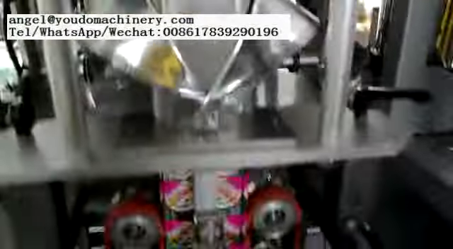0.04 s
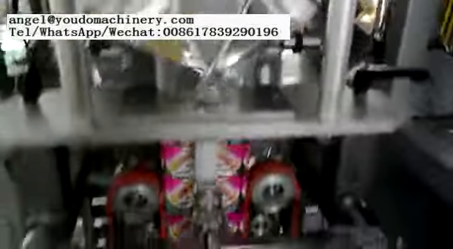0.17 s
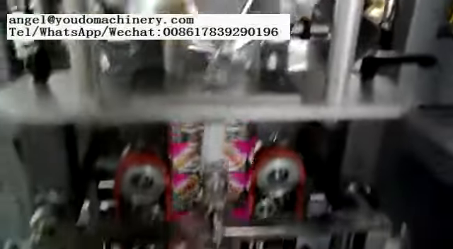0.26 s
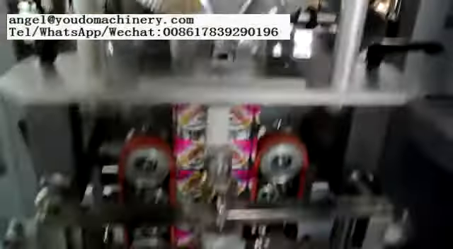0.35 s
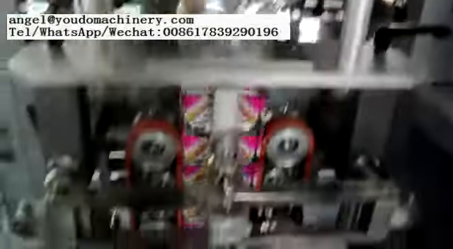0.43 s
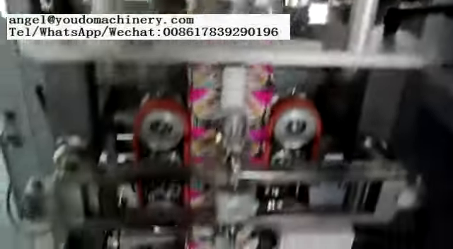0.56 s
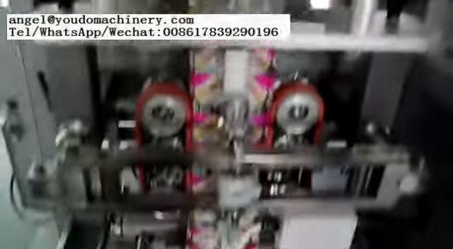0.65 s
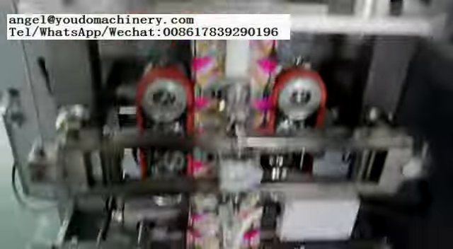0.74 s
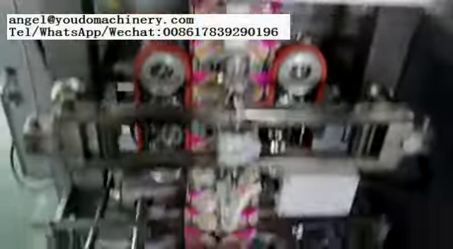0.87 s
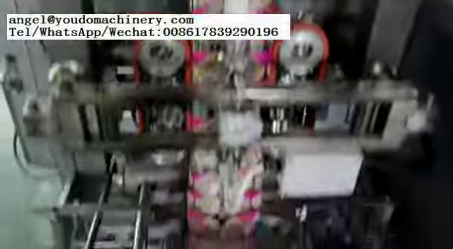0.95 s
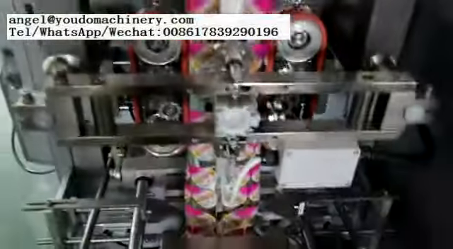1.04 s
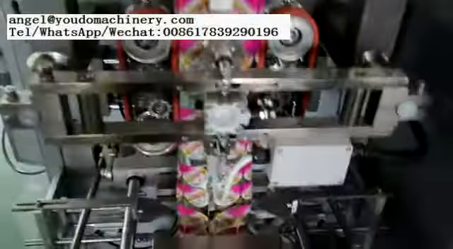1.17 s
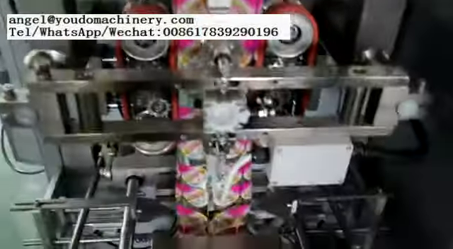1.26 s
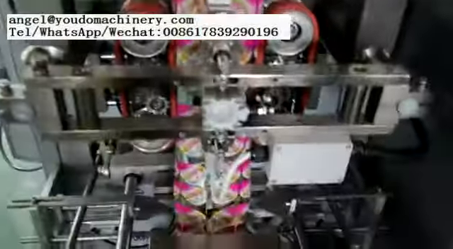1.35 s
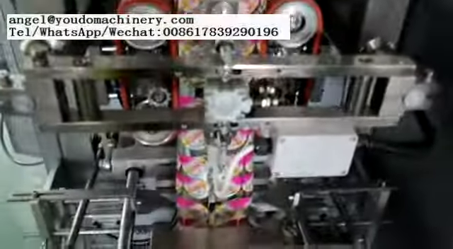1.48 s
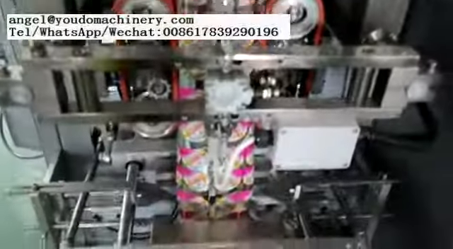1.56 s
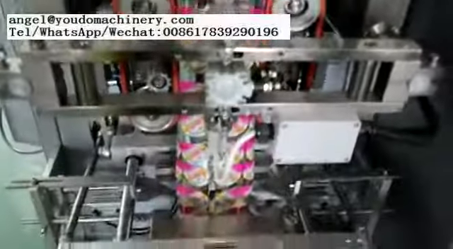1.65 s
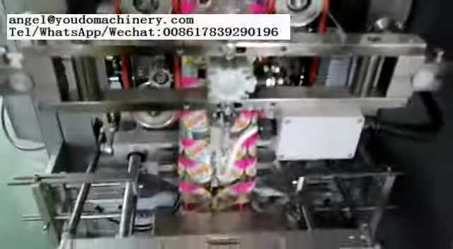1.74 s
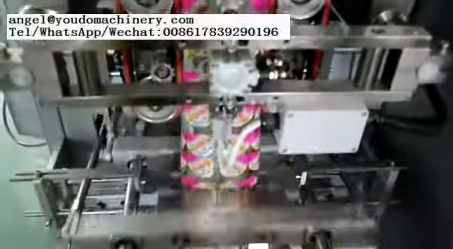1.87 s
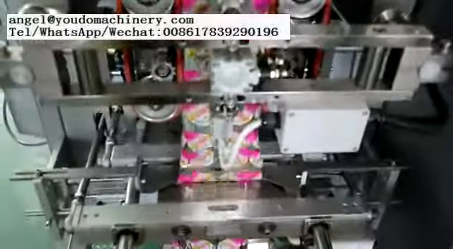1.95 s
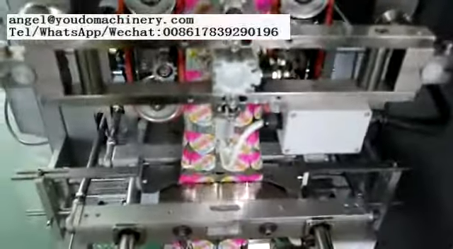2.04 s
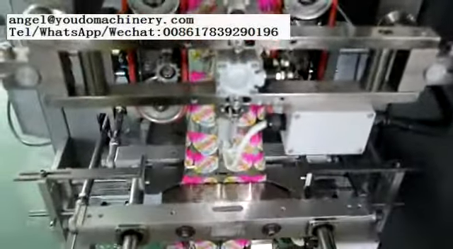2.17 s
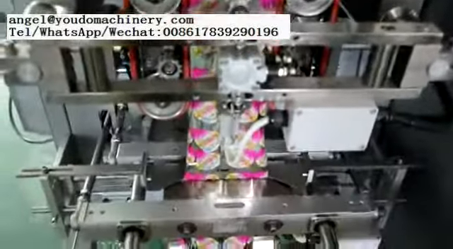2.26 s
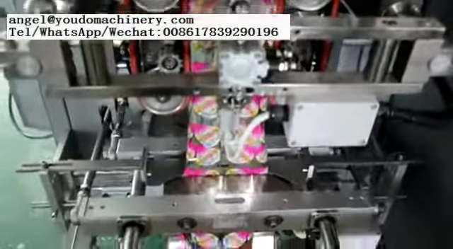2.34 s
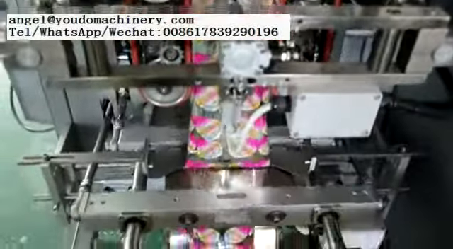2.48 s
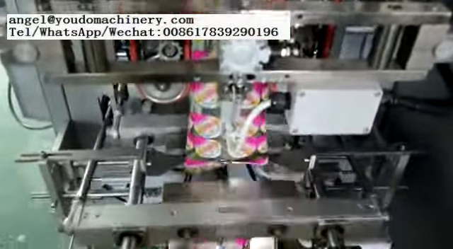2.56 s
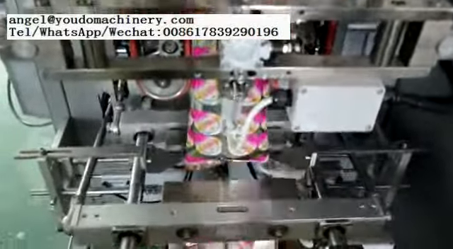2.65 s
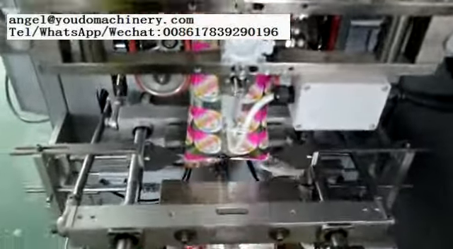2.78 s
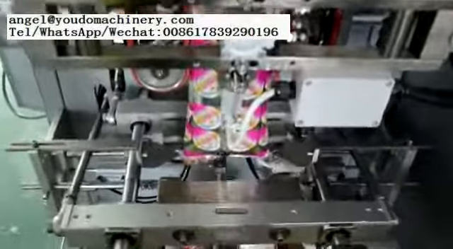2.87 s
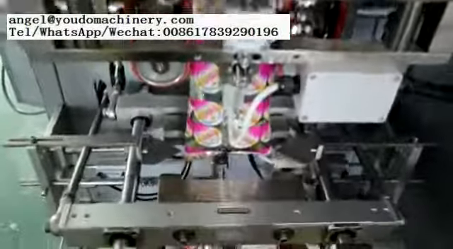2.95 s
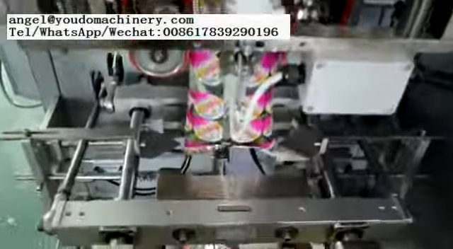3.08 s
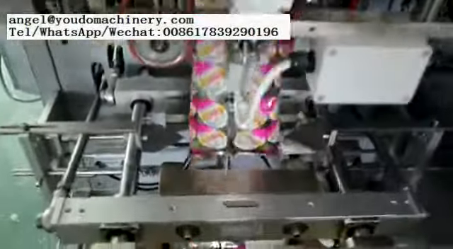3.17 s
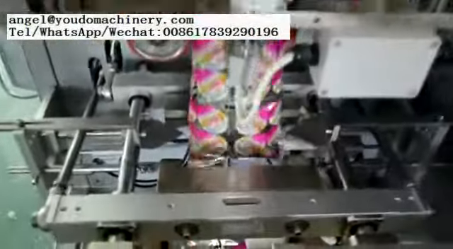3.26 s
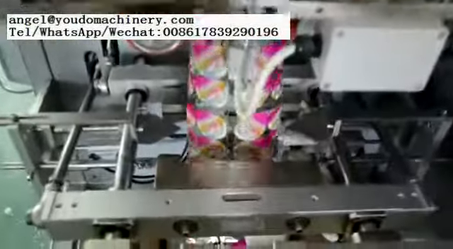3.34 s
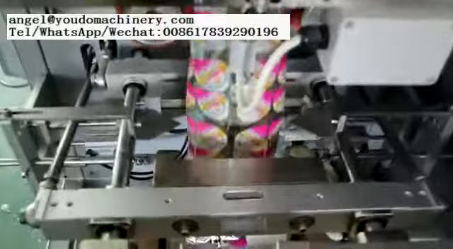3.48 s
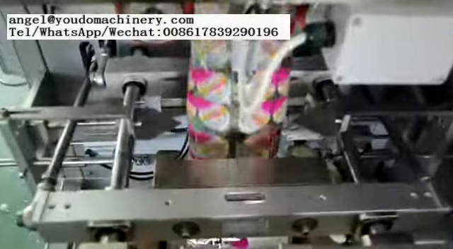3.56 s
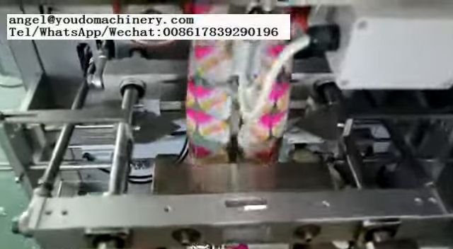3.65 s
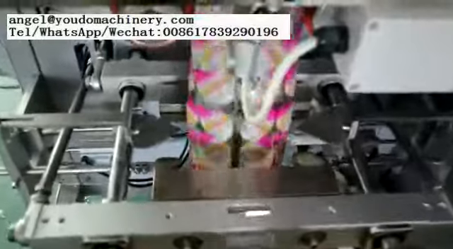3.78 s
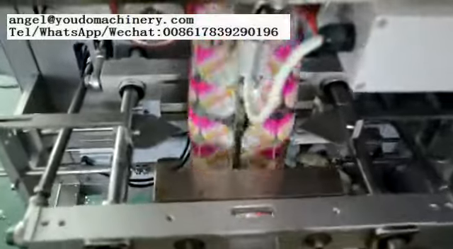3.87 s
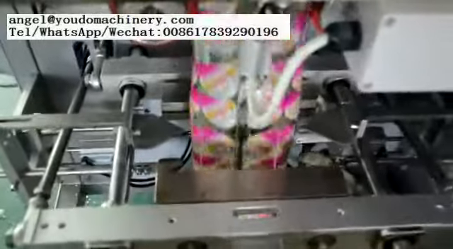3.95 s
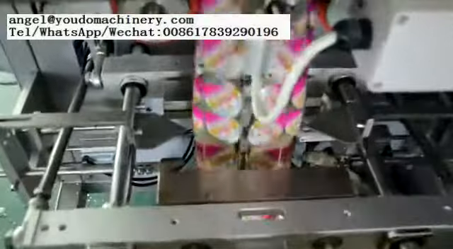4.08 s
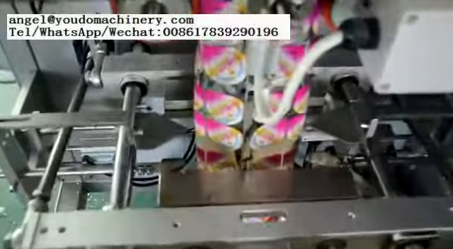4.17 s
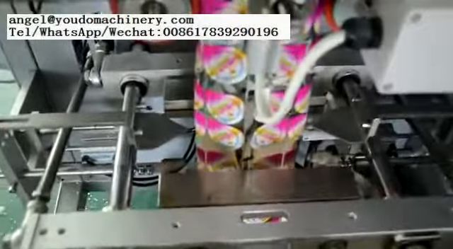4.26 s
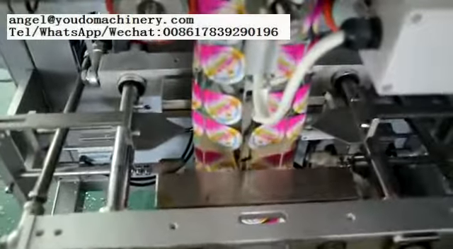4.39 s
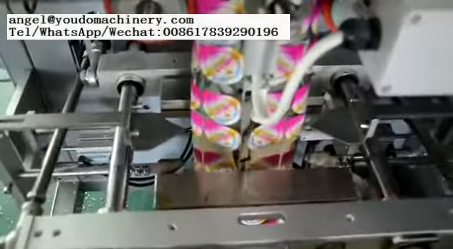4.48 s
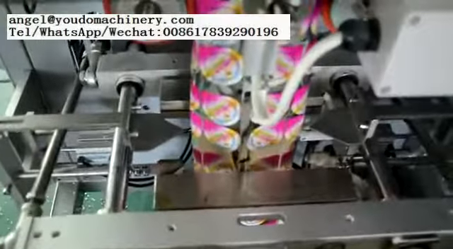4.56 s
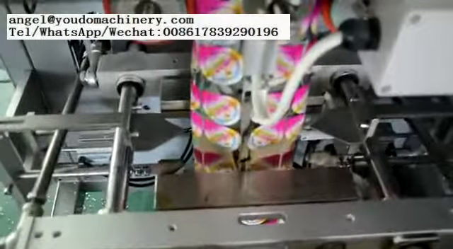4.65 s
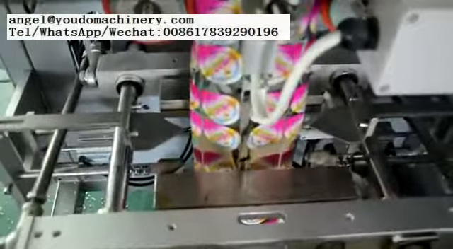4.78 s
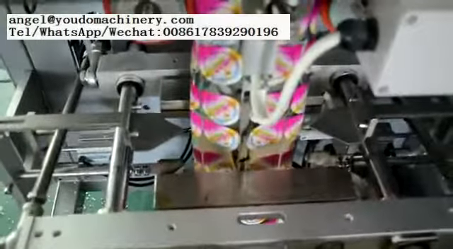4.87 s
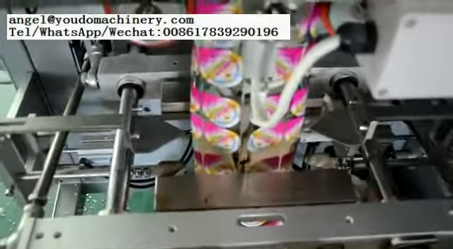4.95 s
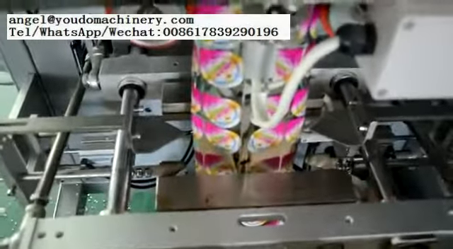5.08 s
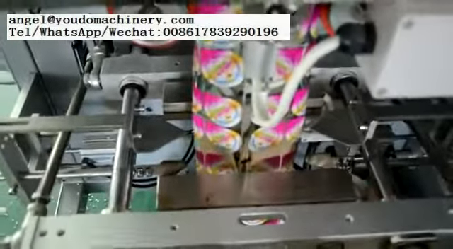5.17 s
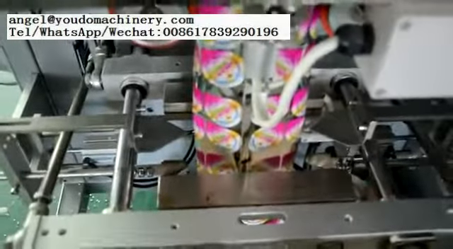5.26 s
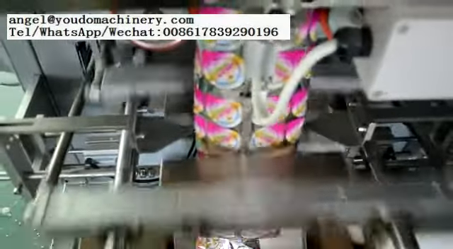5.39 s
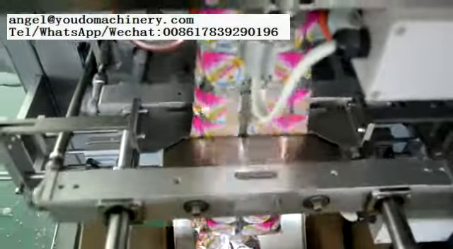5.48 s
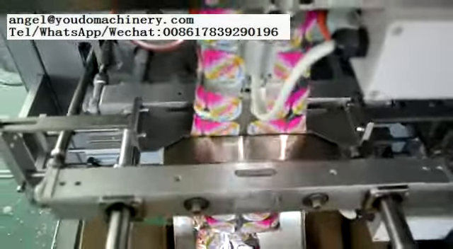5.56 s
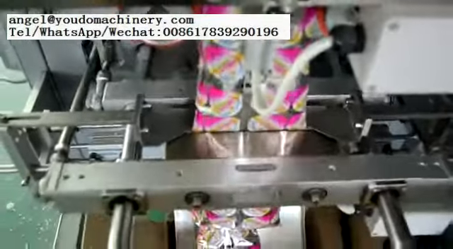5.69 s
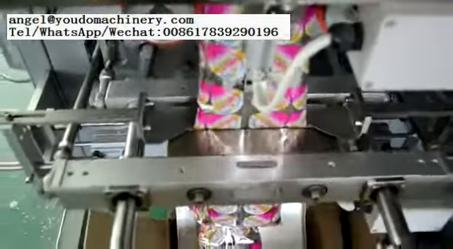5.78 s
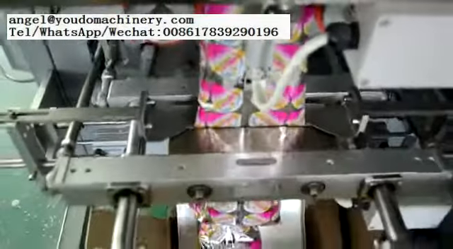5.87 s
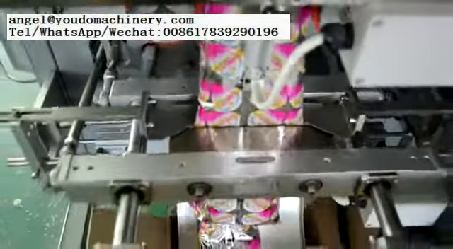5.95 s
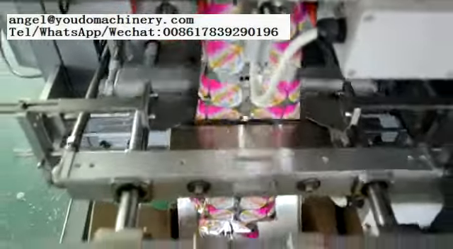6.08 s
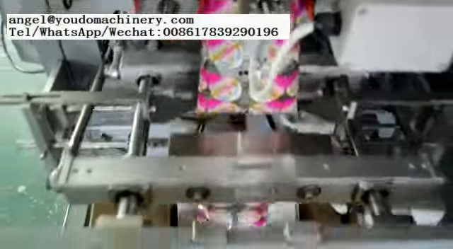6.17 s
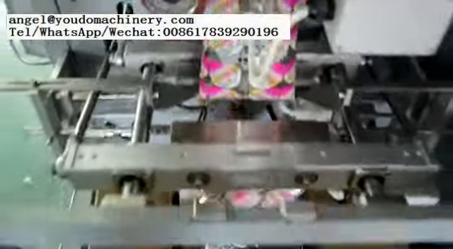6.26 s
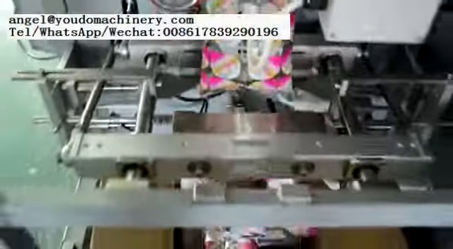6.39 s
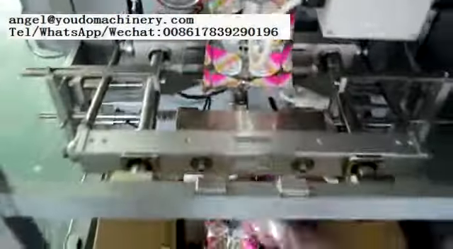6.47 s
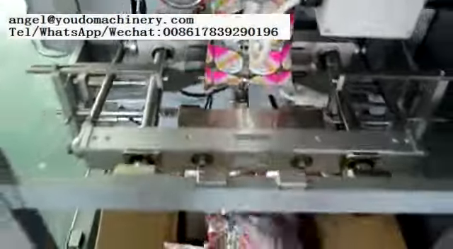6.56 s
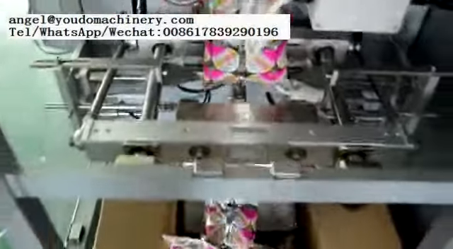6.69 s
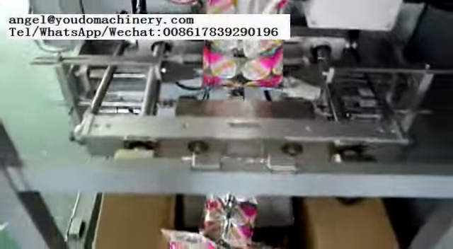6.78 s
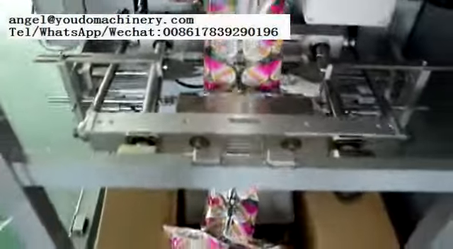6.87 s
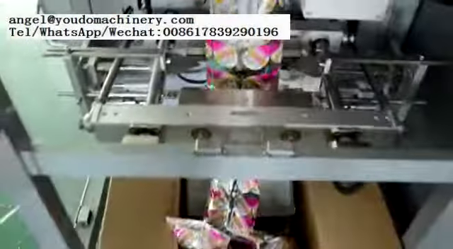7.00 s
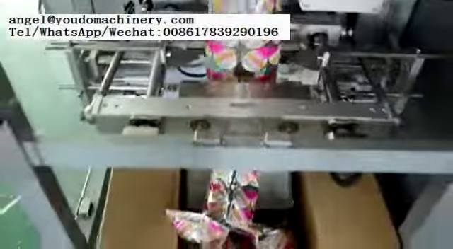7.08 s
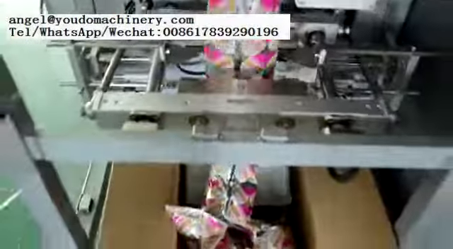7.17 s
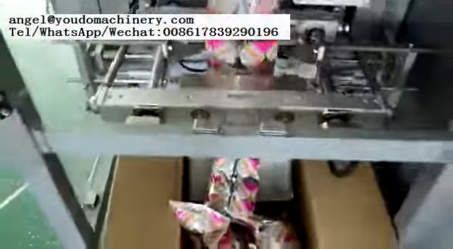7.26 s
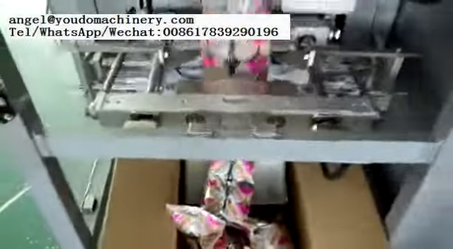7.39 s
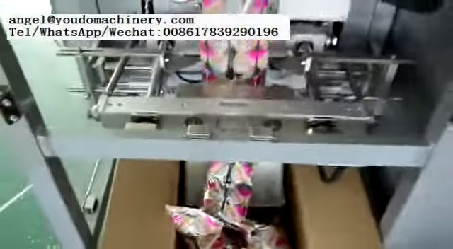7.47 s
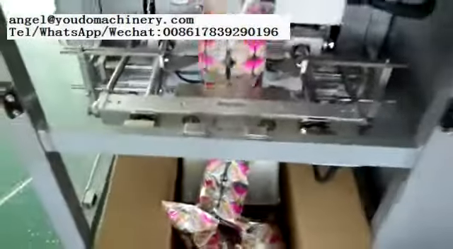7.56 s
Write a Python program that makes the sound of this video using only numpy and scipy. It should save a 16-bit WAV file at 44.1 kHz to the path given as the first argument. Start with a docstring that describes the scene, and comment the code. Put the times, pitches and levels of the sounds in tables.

```python
"""Bag-making packing machine

A phone moves between the forming tube and the sealing jaws of a packing machine in a workshop.
The mains-driven feeder buzzes in steady harmonics and its loose tray rattles as resonant noise.
Jaws scrape as filtered grainy noise and clack shut as ringing steel modes; the frame thumps and shudders.
After the clack a long grainy rush swells and dies away, ringing the modes of the tube.
Ticks, puffs of air and two squeaks are short bursts of noise."""
import sys
import numpy as np
from scipy import signal
from scipy.fft import rfft, irfft
from scipy.io import wavfile
from scipy.ndimage import uniform_filter1d

SR = 44100
rng = np.random.default_rng(int(sys.argv[2]) if len(sys.argv) > 2 else 0)


def file_out(sig):
    """Save sig as 16-bit WAV at sys.argv[1]."""
    # one column per channel
    cols = np.atleast_2d(sig).T
    # limit, then scale
    lim = np.clip(cols, -1, 1)
    pcm = np.round(lim * 32767).astype(np.int16)
    wavfile.write(sys.argv[1], SR, pcm)


N = 336483

TIME = np.arange(N) / SR
FREQ_HZ = np.arange(N // 2 + 1) * SR / N + 1e-3  # just above zero, so the logarithm is finite
MAINS_HZ = 50.03
# first jaw clack heard, length of a machine cycle, how long before its clack a cycle starts
CLACK_S, CYCLE_S, LEAD_S = 1.653, 3.558, 0.15


def undb(db):
    """dB to gain."""
    return 10 ** (np.asarray(db) / 20)


def unit(x):
    """Scales to rms 1."""
    return x / np.sqrt(np.mean(x ** 2))


def colour(x, tone, peaks=()):
    """Filters by (hz, level_db) points plus bell-shaped (hz, width_hz, boost_db) resonances."""
    hz, db = np.transpose(tone)
    gain_db = np.interp(np.log(FREQ_HZ), np.log(hz), db)
    for centre_hz, width_hz, boost_db in peaks:
        gain_db = gain_db + boost_db / (1 + ((FREQ_HZ - centre_hz) / (width_hz / 2)) ** 2)
    return irfft(rfft(x) * undb(gain_db), N)


def band(x, lo_hz, hi_hz):
    """Soft-edged band; neighbours add up to flat power."""
    def below(hz):
        return 1 / (1 + (FREQ_HZ / hz) ** 6)
    power = np.abs(below(hi_hz) - below(lo_hz))
    return irfft(rfft(x) * np.sqrt(power), N)


def walk(rate):
    """Random levels held 1 / rate s and slewed twice, without slow drift; spread 1."""
    hold = int(SR / rate)
    steps = np.repeat(rng.standard_normal(N // hold + 1), hold)
    smooth = uniform_filter1d(uniform_filter1d(steps, hold), hold)[:N]
    return unit(smooth - uniform_filter1d(smooth, 4 * hold))


def add(out, start_s, sound):
    """Mixes a sound in at its start time."""
    i = int(start_s * SR)
    out[i:i + len(sound)] += sound[:N - i]


def grainy(rate, share, spread_db, smear_s):
    """Noise with many tiny impacts of uneven size in it, about rate of them a second."""
    sizes = undb(spread_db * np.minimum(rng.exponential(size=N), 3))
    hits = (rng.random(N) < rate / SR) * sizes
    tail = np.exp(-np.arange(400) / (smear_s * SR))
    crackle = unit(signal.fftconvolve(hits, tail)[:N] * rng.standard_normal(N))
    return rng.standard_normal(N) + share * crackle


def played(x, levels_db, flicker_db, rate):
    """Bass, middle and treble follow their levels, with a shared flicker and a faster one of their own."""
    out = np.zeros(N)
    shared = walk(rate)
    for db, (lo_hz, hi_hz) in zip(levels_db, [(60, 1000), (1000, 3000), (3000, 9000)]):
        flicker = shared + walk(2 * rate)
        out += unit(band(x, lo_hz, hi_hz)) * undb(db + flicker_db * flicker)
    return out


def burst(fall_s, hz, octaves):
    """Band-passed noise around one pitch, peak 1; its decay alone loses 48 dB in fall_s."""
    t = np.arange(int(0.2 * SR)) / SR
    edges_hz = [hz * 2 ** (-octaves / 2), hz * 2 ** (octaves / 2)]
    sos = signal.butter(2, edges_hz, "band", fs=SR, output="sos")
    envelope = 0.0039 ** (t / fall_s) * (1 - np.exp(-t / (0.11 * fall_s)))
    sound = signal.sosfilt(sos, rng.standard_normal(len(t))) * envelope
    return sound / np.abs(sound).max()


# offsets of the cycle under way at the start and the two after it: rush_bass_db, rush_middle_db,
# rush_treble_db, tube_ring_db, slide_db, shudder_db
CYCLE_OFFSETS = [(1, -10, 3.5, 8.5, -4, -1.5), (0, 0, .4, -1.5, 0.4, .4),
                 (-0.56, -1.7, -0.13, -1, 0.8, 0.4)]


def cycled(s, db, column, late_s=(0, 0, 0)):
    """A dB curve in seconds after the clack, repeated, with each cycle's own offset and delay."""
    count, since_start = np.divmod(TIME - CLACK_S + LEAD_S, CYCLE_S)
    count = count.astype(int) + 1
    after_clack = since_start - LEAD_S - np.array(late_s)[count]
    return np.interp(after_clack, s, db) + np.array(CYCLE_OFFSETS)[count, column]


SHOP_T60_S, SHOP_DB = 0.3, -9


def workshop(near):
    """Room echo: the sound smeared through a decaying noise tail that starts after 8 ms."""
    t = np.arange(int(0.8 * SR)) / SR
    echo = rng.standard_normal(len(t)) * 1e-3 ** (t / SHOP_T60_S) * (t > 0.008)
    echo = undb(SHOP_DB) * echo / np.sqrt(np.sum(echo ** 2))
    return signal.fftconvolve(near, echo)[:N]


# path of the phone: time_s, place (0 by the forming tube to 1 by the jaws)
PHONE_PATH = [(0, 0), (1.5, 0.063), (2.4, 0.089), (3.2, 0.91), (4, 0.88), (4.6, 1), (5.2, 0.92), (6.1, .15),
              (6.6, 0.62), (7.1, 0), (7.63, 0.05)]


def phone_place():
    """How near the phone is to the jaws; it sets the balance of the feeder sounds."""
    return np.clip(np.interp(TIME, *np.transpose(PHONE_PATH)), 0, 1)


# harmonic numbers of the mains in the buzz
BUZZ_ORDERS = [2, 3, 4, 6, 8, 9, 11, 12, 13, 16, 17, 19, 21, 22, 30, 31, 33, 34, 40, 42, 46, 52, 55, 56, 58,
               60, 64, 67, 69, 70]
# rms of each harmonic before wander and sag: by_tube_db, by_jaws_db
BUZZ_LEVELS = [(-48.5, -43.5), (-48, -42), (-62, -48.5), (-48.5, -68.5), (-57, -49), (-62.5, -55.5),
               (-73, -65.5), (-59.5, -67), (-47, -51), (-60.5, -58), (-69, -56), (-66, -44.5), (-52, -48.5),
               (-50, -51), (-56.5, -48.5), (-59, -49), (-56, -66), (-48, -47), (-48.5, -41), (-49.5, -59.5),
               (-51, -48), (-48.5, -50), (-51, -57.5), (-55.5, -44.5), (-50, -59.5), (-56.5, -44.5),
               (-62, -47), (-51.5, -54.5), (-57, -43), (-45.5, -59.5)]
# the buzz sags during the rush: after_clack_s, gain_db
BUZZ_SAG = [(-.15, 3.5), (.8, -7), (1.45, 3), (2.1, 3.5), (3.4, 4)]


def feeder_buzz(place):
    """The feeder magnet is driven by the mains: steady harmonics that wander a little in level."""
    sag_db = np.interp(TIME - CLACK_S, *np.transpose(BUZZ_SAG), period=CYCLE_S)
    turn = 2 * np.pi * MAINS_HZ * TIME
    buzz = np.zeros(N)
    for order, (tube_db, jaws_db) in zip(BUZZ_ORDERS, BUZZ_LEVELS):
        db = tube_db + place * (jaws_db - tube_db) + 1.3 * walk(3)
        buzz += np.sqrt(2) * undb(db) * np.sin(order * turn + rng.uniform(0, 2 * np.pi))
    return buzz * undb(sag_db)


# overall rattle gain: by_tube_db, by_jaws_db
RATTLE_GAINS = (-25.5, -24.5)
# rattle spectrum: hz, level_db (per Hz)
RATTLE_TONE = [(18, -67), (30, -19.5), (69, -11.5), (90, -7.5), (150, -11), (270, -7.5), (500, -9.5),
               (800, -10), (1300, -5.5), (1900, -3), (3200, -3), (5000, -6), (7500, -9.5), (9700, -15)]
# tray resonances: pitch_hz, width_hz, by_tube_boost_db, by_jaws_boost_db
TRAY_MODES = [(704, 48, 6.5, 8), (1010, 120, 5.5, 2.5), (1560, 74, 3, 7.5), (1610, 56, -1.5, -5),
              (1840, 22, -0.5, 17), (1883, 35, 11.5, 6.5), (2013, 130, 3.5, 2.5), (2192, 85, 6.5, 7.5),
              (2290, 55, 0.5, 4), (2740, 130, 0.5, 6), (3085, 70, 3.5, 10.5), (3410, 40, 3, 2.5),
              (4350, 400, 4, 3), (5300, 190, -2.5, 1.5), (5440, 140, 3.5, 5.5), (6250, 400, 3, 4),
              (7800, 91, 12.5, -10)]


def tray_rattle(place):
    """The magnet pulls once a mains cycle and a loose, resonant tray rattles in step."""
    mains_turns = MAINS_HZ * TIME
    rattle = np.zeros(N)
    for spot, share in enumerate([1 - place, place]):
        # part of the clatter is the same in every mains cycle
        one_turn = rng.standard_normal(int(SR / MAINS_HZ))
        repeat = np.interp(mains_turns % 1 * len(one_turn), np.arange(len(one_turn)), one_turn)
        shake = grainy(600, 0.27, 3.2, 0.00066) + 0.31 * repeat
        modes = [(row[0], row[1], row[2 + spot]) for row in TRAY_MODES]
        rattle += np.sqrt(share) * unit(colour(shake, RATTLE_TONE, modes))
    # the upper bands pulse with the mains and flicker on their own
    for lo_hz, hi_hz in [(1000, 2600), (2600, 5700), (5700, 9000)]:
        change = 0.08 * np.cos(2 * np.pi * mains_turns) + undb(0.85 * walk(26)) - 1
        rattle += band(rattle, lo_hz, hi_hz) * change
    return rattle * undb(np.interp(place, [0, 1], RATTLE_GAINS))


def feeder():
    """The magnet's buzz and the tray's rattle, as heard from where the phone is."""
    place = phone_place()
    return feeder_buzz(place) + tray_rattle(place)


# ticks and small knocks: start_s, peak_db, centre_hz, width_octaves, fall_s (48 dB)
TICKS = [(0.7194, -2.5, 4600, 0.87, 0.0087), (1.357, -14.5, 2160, 0.32, 0.065),
         (1.438, -16, 2140, 0.43, 0.083), (3.253, -9.5, 795, 0.59, 0.092), (3.28, -19, 1240, .26, 0.07),
         (3.312, -18, 920, .27, .04), (3.581, -2.5, 4400, 0.7, 0.019), (3.594, -5.5, 2780, 0.71, 0.022),
         (3.654, -11, 4320, 1.8, .04), (3.85, -15, 2400, .9, .04), (3.945, -10, 3300, 1.6, 0.09),
         (3.99, -19, 2800, .9, 0.036), (4.043, -14.5, 2010, 0.48, 0.054), (4.69, -18, 1830, .2, 0.11),
         (4.70, -17, 3200, .75, 0.09), (4.895, -13.5, 5000, 1.6, 0.095), (5.188, -7, 4950, 0.47, 0.034),
         (5.44, -21, 2120, .2, .1), (5.74, -6, 1320, 0.56, 0.039), (5.778, -2.5, 1880, 0.91, .04),
         (6.535, -13, 2980, 1.4, .04), (7.004, -17, 2500, .8, 0.043), (7.192, -11, 5000, 1.2, 0.037),
         (7.345, -15.5, 1900, 0.25, 0.03), (7.362, -10.5, 4600, 1.1, 0.03), (7.55, -15, 4000, 0.66, .05),
         (7.597, -17.5, 1350, .3, 0.033)]


def ticks():
    """Small parts knock: short bursts of noise around one pitch."""
    out = np.zeros(N)
    for start_s, peak_db, hz, octaves, fall_s in TICKS:
        add(out, start_s, undb(peak_db) * burst(fall_s, hz, octaves))
    return out


# puffs of air from the valves: start_s, peak_db
PUFFS = [(1.478, -13), (1.578, -15.5), (4.168, -15.5), (5.039, -14.5), (5.137, -16), (7.317, -18)]


def puffs():
    """Escaping air: short bursts of high hiss."""
    out = np.zeros(N)
    for start_s, peak_db in PUFFS:
        add(out, start_s, undb(peak_db) * burst(fall_s=0.075, hz=6300, octaves=0.35))
    return out


# short squeaks as the first full rush sets in: start_s, peak_db
SQUEAKS = [(2.148, -20.5), (2.215, -16)]


def squeaks():
    """Short squeaks: noise in a band narrow enough to have a pitch."""
    out = np.zeros(N)
    for start_s, peak_db in SQUEAKS:
        add(out, start_s, undb(peak_db) * burst(fall_s=0.17, hz=602, octaves=0.18))
    return out


# thumps through the frame: start_s, peak_db, pitch_hz
THUMPS = [(1.581, -18.5, 248), (1.648, -22, 255), (1.804, -12, 181.4), (1.825, -8.5, 242.5),
          (1.849, -23, 235), (1.916, -22.5, 182), (1.984, -18, 187), (2.011, -13.5, 247),
          (2.049, -21.5, 163.4), (2.338, -20, 224), (2.436, -14, 186), (2.473, -20, 233), (3.125, -22, 250),
          (5.138, -20.5, 219), (5.206, -19, 257), (5.277, -18, 185), (5.358, -16, 180), (5.381, -12, 181.5),
          (5.445, -25, 169), (5.485, -17.5, 177), (5.559, -16, 236), (5.577, -11, 161), (5.63, -18.5, 191),
          (5.894, -18.5, 192), (5.994, -19.5, 192)]
THUMP_FALL_S = 0.093  # time for the decay to lose 61 dB


def thumps():
    """Soft pushes set low panel modes ringing, one main pitch with three weaker ones around it."""
    out, t = np.zeros(N), np.arange(int(0.4 * SR)) / SR
    swell = (1 - np.exp(-t / 0.007)) * 0.0009 ** (t / THUMP_FALL_S)
    for start_s, peak_db, hz in THUMPS:
        wave = np.sin(2 * np.pi * hz * t)
        for ratio, share in [(0.72, 0.4), (1.35, 0.4), (1.9, 0.34)]:
            wave += share * np.sin(2 * np.pi * ratio * hz * t + rng.uniform(0, 2 * np.pi))
        thump = swell * wave
        add(out, start_s, undb(peak_db) * thump / np.abs(thump).max())
    return out


# shudder level before cycle offset and flicker: after_clack_s, level_db
SHUDDER = [(-.1, -55.5), (0, -32.5), (.2, -37), (.8, -34.5), (1.15, -41), (1.9, -39), (2.4, -49),
           (3.4, -51)]
# panel spectrum: hz, level_db (per Hz)
PANEL_TONE = [(60, -34.5), (110, -4), (150, 3.5), (220, 2), (330, -13.5), (520, -6), (900, -26.5)]


def shudder():
    """The frame shudders around the clack: low panel noise of uneven level."""
    panel = unit(colour(rng.standard_normal(N), PANEL_TONE)) * undb(2.0 * walk(16))
    return panel * undb(cycled(*np.transpose(SHUDDER), column=5))


# rush down the tube before cycle offsets: after_clack_s, bass_db, middle_db, treble_db, tube_ring_db
RUSH = [(.27, -44, -44, -34, -73.5), (.36, -33, -37, -23, -62), (.44, -36.5, -29.5, -21.5, -39),
        (.5, -26.5, -21, -17.5, -24.5), (.56, -28.5, -16, -21, -23.5), (.68, -29, -15.5, -21.5, -24.5),
        (.8, -27.5, -17, -18.5, -32), (1.0, -30.5, -17.5, -18, -26.5), (1.25, -29.5, -23, -15.5, -28.5),
        (1.6, -29, -21.5, -20, -35), (1.75, -30, -25, -24.5, -38), (1.9, -34, -25.5, -30.5, -37.5),
        (2.32, -37.5, -33, -32, -49.5), (2.4, -48, -41.5, -41, -62)]
# rush spectrum: hz, level_db (per Hz)
RUSH_TONE = [(120, -22.5), (200, -8.5), (340, -2), (673, 0.5), (1060, -1), (1350, 3.5), (2520, 4),
             (5130, 4.5), (5800, 4), (6440, 2.5), (7500, 3.5), (9750, -33), (16500, -120)]
# how late the rush runs in each cycle, negative for early: delay_s
RUSH_DELAYS = (-0.016, -.015, 0.013)
# the middle of the rush dips briefly: centre_s, change_db, length_s (centre to 1/e of the change)
RUSH_DIPS = [(2.372, -6, 0.037), (2.566, -3.5, 0.058), (0.19, -7, 0.1), (2.911, -2.5, 0.068),
             (5.967, 0, 0.035), (4.5, -9, .07), (6.05, -1, .025)]
# tube modes before flicker: pitch_hz, width_hz, opening_rush_db, first_full_rush_start_db,
# first_full_rush_rest_db, second_full_rush_db
TUBE_MODES = [(597, 14, -9, -7, -12, -11), (956, 39, -7, -4, -26, -15.5), (1186, 81, 5, -14, -15.5, -7),
              (1345, 130, -3, 5.5, -1, -7), (1756, 28, -24, -5, 2.5, -10.5), (1785, 59, -7, -10, -10, -6),
              (1964, 40, -9, -3.5, -5.5, 0.5), (2154, 93, -1, -10.5, -0.5, -1),
              (2420, 28, -26, -9, -13.5, -6.5), (2450, 200, 3.5, 3, -7.5, -2.5), (2650, 66, -14, 4, -7, -7),
              (2780, 36, -10.5, -8.5, -5.5, -15.5), (2980, 74, 1, -17, -14, -4),
              (3230, 40, -9, -8.5, -15.5, -16.5), (3385, 11, -5, -13, -9.5, -6),
              (4040, 29, -4, -11, 4, -1.5), (4410, 83, -5, -6, -0.5, -5.5), (4980, 46, -9, -16, -2.5, -3),
              (6660, 95, -9, -22.5, -5, -15.5)]
DIP_RING = 2.2  # the tube ring dips this many times deeper in dB


def rush():
    """A dense stream of small impacts and air; rubbing also rings the narrow modes of the tube, each by fits."""
    stream = grainy(900, 0.54, 5.4, 0.0038)
    spectrum, ring = rfft(stream), np.zeros(N)
    stretch = np.digitize(TIME, [1, 2.36, 4.5])  # seconds where the mode levels step
    for hz, width_hz, *levels_db in TUBE_MODES:
        resonance = 1 / (1 + 2j * (FREQ_HZ - hz) / width_hz) ** 1.39
        mode = unit(irfft(spectrum * resonance, N))
        ring += mode * undb(np.array(levels_db)[stretch] + 3.6 * walk(25))
    dip_db = np.zeros(N)
    for centre_s, change_db, length_s in RUSH_DIPS:
        dip_db += change_db * np.exp(-((TIME - centre_s) / length_s) ** 2)
    s, *curves = np.transpose(RUSH)
    bass_db, middle_db, treble_db, ring_db = (
        cycled(s, db, column=k, late_s=RUSH_DELAYS) for k, db in enumerate(curves))
    # the last term evens out the power of the summed modes
    ring *= undb(ring_db + DIP_RING * dip_db - 10 * np.log10(len(TUBE_MODES)) / 2)
    levels_db = [bass_db, middle_db + dip_db, treble_db]
    return played(colour(stream, RUSH_TONE), levels_db, flicker_db=0.5, rate=40) + ring


# jaws sliding on their rods, before cycle and band offsets: after_clack_s, level_db
SLIDE = [(-.1, -41), (-.02, -28.5), (.006, -19.5), (.05, -23), (.095, -21), (.125, -24), (.14, -17),
         (.18, -22.5), (.235, -29), (.29, -46)]
# slide spectrum: hz, level_db (per Hz)
SLIDE_TONE = [(120, -22), (200, 9.5), (447, 4.5), (748, 1), (1060, -2.5), (1290, -3.5), (2330, -3.5),
              (2760, -5), (5710, -10), (7500, -10.5), (9750, -37), (16500, -120)]
# slide band offsets: bass_db, middle_db, treble_db
SLIDE_BANDS = (-5.5, -1.5, -2.5)


def jaw_slide():
    """The jaws scrape along their rods: grainy friction noise around each clack."""
    s, db = np.transpose(SLIDE)
    s = np.r_[s[0] - 0.02, s, s[-1] + 0.02]
    db = np.r_[-90, db, -90]  # near silence outside the slide
    slide_db = cycled(s, db, column=4)
    scrape = colour(grainy(900, 0.5, 3.0, 0.002), SLIDE_TONE)
    return played(scrape, [slide_db + offset for offset in SLIDE_BANDS], flicker_db=1.0, rate=30)


# blows on the jaws: start_s, peak_db, brightness_db (per octave, tilting the modes about 1 kHz)
BLOWS = [(0.398, -18, 1), (1.581, -10, 6), (1.637, -12.5, 6.5), (1.653, 2.5, 3), (1.666, -3.5, -1.8),
         (1.75, -6, 3), (1.783, 2, -0.2), (1.79, -7.5, 5), (1.8, -7.5, -2.5), (1.819, -8, 1.5),
         (2.01, -10, -1.5), (2.97, -9.5, -5), (5.138, -11, 6.5), (5.214, 1, 1), (5.224, -4, 3),
         (5.288, -11, 0), (5.342, 1.5, 3), (5.349, -2, 3.5), (5.379, -3.5, -4), (5.429, -11, 10),
         (5.57, -7.5, -1), (5.676, -7, 2.5), (5.992, -12, -11), (6.009, -1, 3.5)]
# steel modes of the free jaws, before each blow's own variation: pitch_hz, level_db, free_t60_s
JAW_MODES = [(277, -4, 0.12), (420, -4, 0.077), (480, -2, 0.095), (638, 5, 0.07), (744, 0.5, 0.023),
             (867, -2.5, 0.13), (1040, 2, 0.072), (1163, -6.5, 0.062), (1351, -4.5, 0.23),
             (1420, 3.5, 0.055), (1631, -1, 0.062), (1880, 3, 0.069), (2195, -5.5, 0.062),
             (2710, -2, 0.027), (2873, -4, 0.077), (3133, -2, 0.031), (3460, 2.5, 0.031),
             (3980, -4.5, 0.07), (4350, -8, 0.11), (4900, -4.5, 0.042), (6150, -12.5, 0.039)]
RING = 0.92  # share of the free ring time left with the jaws on their rods
CONTACT_S = 0.00099  # rise time constant of a blow


def jaw_blows():
    """A quick contact rings close clusters of three steel modes, with a bright noise crack on top."""
    out, t = np.zeros(N), np.arange(int(0.25 * SR)) / SR
    hz, db, free_t60_s = np.repeat(JAW_MODES, 3, axis=0).T[:, :, None]
    decay = np.exp(-np.log(1000) * t / (RING * free_t60_s))
    for start_s, peak_db, bright_db in BLOWS:
        # every blow excites, tunes and phases the modes differently
        level, detune, phase = rng.standard_normal((3, len(hz), 1))
        gain = undb(db + 5.3 * level + bright_db * np.log2(hz / 1000))
        wave = np.sin(2 * np.pi * hz * (1 + 0.05 * detune) * t + 3 * phase)
        modes = (gain * wave * decay).sum(axis=0)
        crack = np.diff(rng.standard_normal(len(t)), prepend=0) * np.exp(-t / 0.0029)
        blow = unit(modes) + 1.5 * undb(bright_db) * crack
        blow = blow * (1 - np.exp(-t / CONTACT_S))
        add(out, start_s, undb(peak_db) * blow / np.abs(blow).max())
    return out


def scene():
    """The machine close by, its echo from the workshop, and the feeder."""
    jaws = jaw_slide() + jaw_blows()
    frame = thumps() + shudder()
    small_sounds = ticks() + puffs() + squeaks()
    near = jaws + frame + small_sounds + rush()
    return (near + workshop(near) + feeder())[None]


# low end and overall tone of the microphone: hz, level_db
MIC_TONE = [(20, -4.5), (60, -1.5), (110, -0.24), (20000, -1.75)]
# narrow dips of the microphone path: centre_hz, width_hz, gain_db
MIC_NOTCHES = [(5700, 330, -8), (5735, 70, -10), (6900, 90, -14)]
TOP_HZ = 7560  # steep upper limit of the phone


def record(dry):
    """The phone has narrow treble dips and softened deep bass, rounds the loudest peaks and cuts the top."""
    x = colour(dry[0], MIC_TONE, MIC_NOTCHES)
    x = x / (1 + (x / 0.86) ** 4) ** 0.25  # peaks bend towards 0.86
    top_cut = signal.ellip(12, 0.3, 60, TOP_HZ, fs=SR, output="sos")
    return signal.sosfilt(top_cut, x)[None]


dry = scene()
out = record(dry)
file_out(out)
```